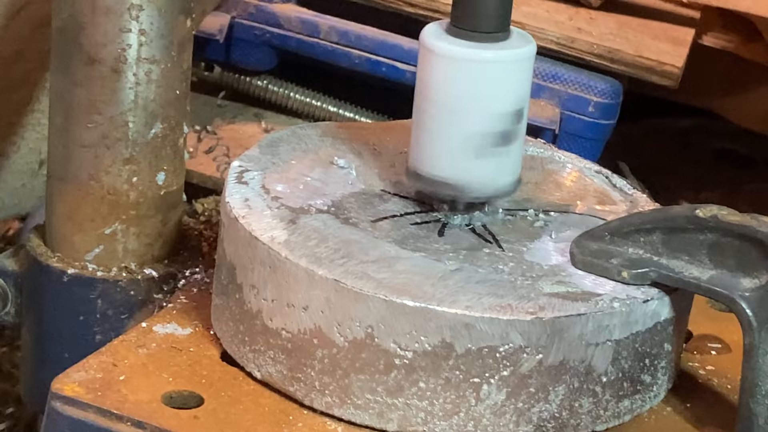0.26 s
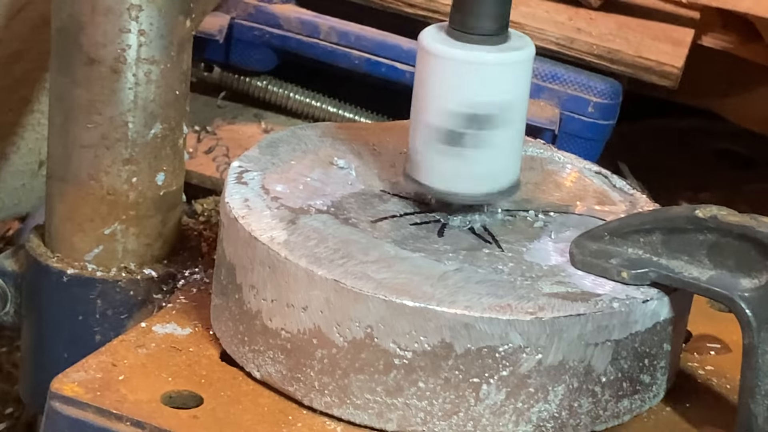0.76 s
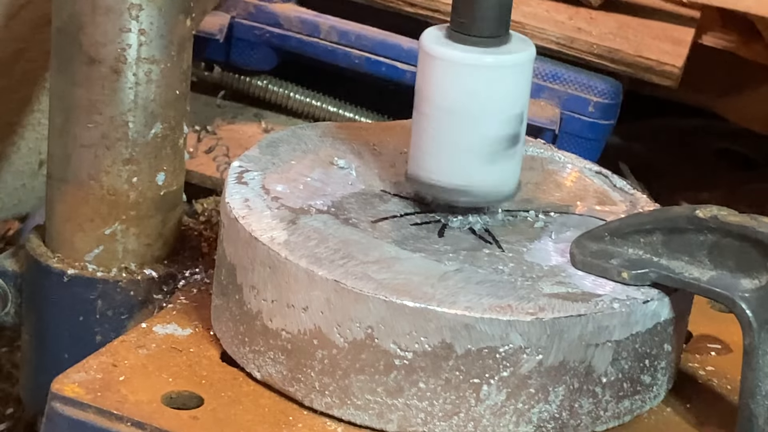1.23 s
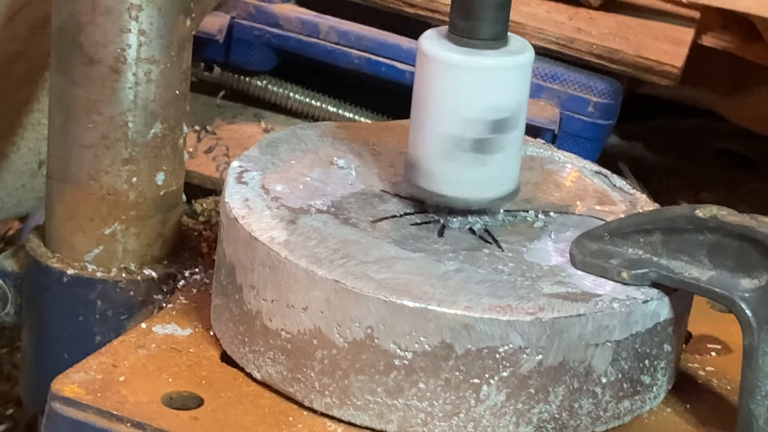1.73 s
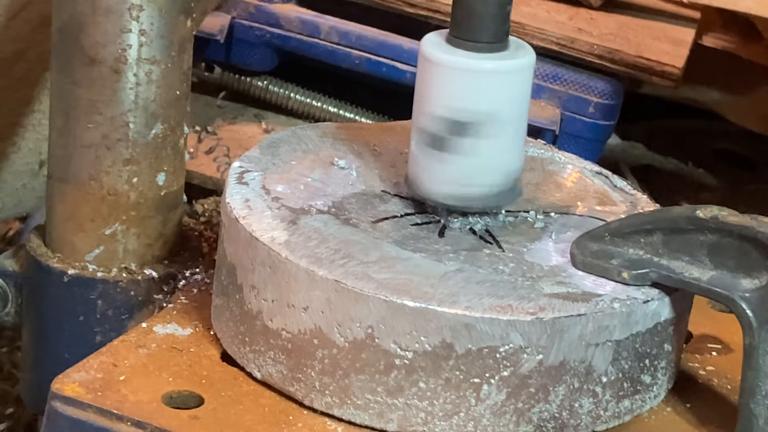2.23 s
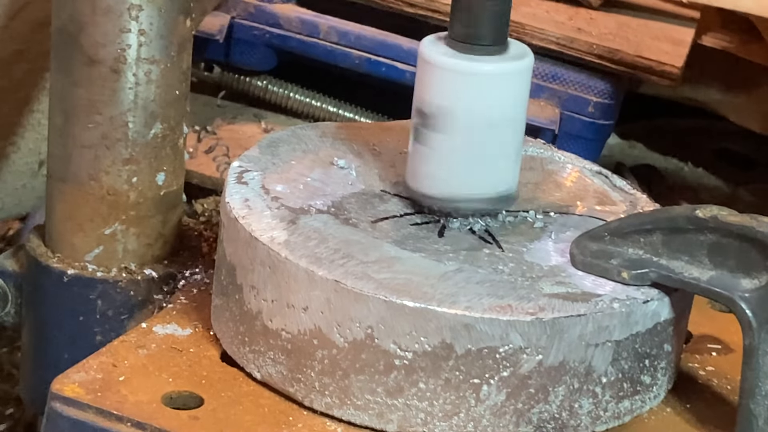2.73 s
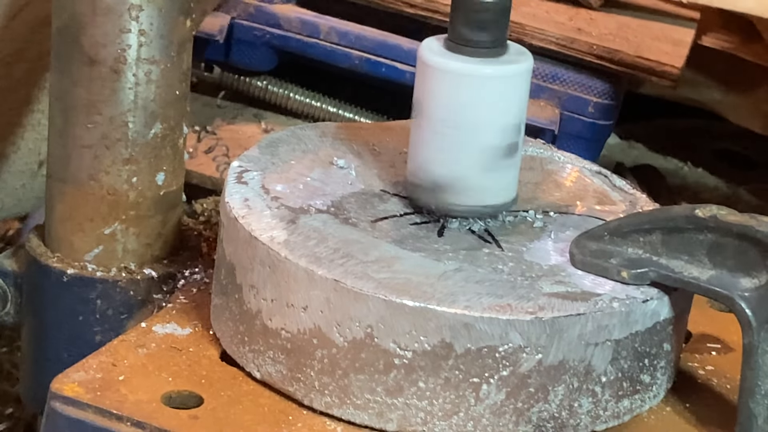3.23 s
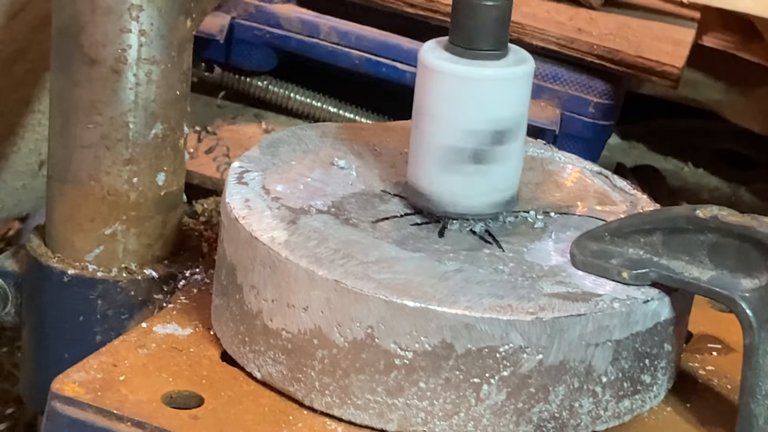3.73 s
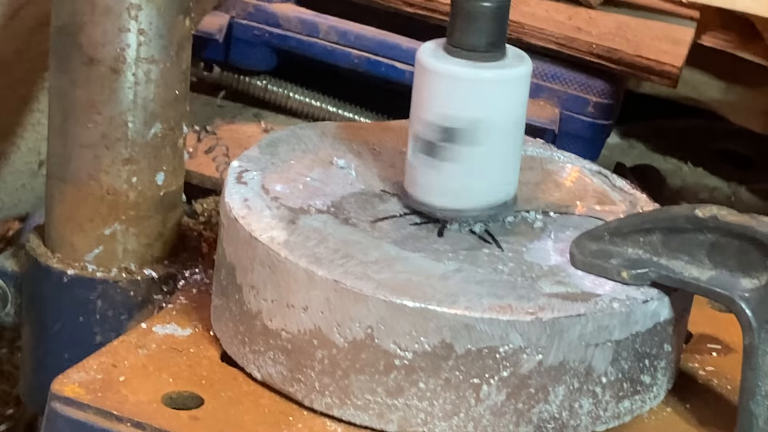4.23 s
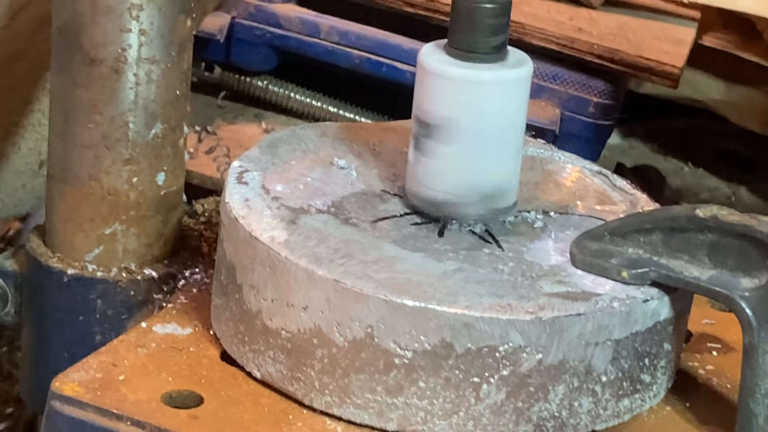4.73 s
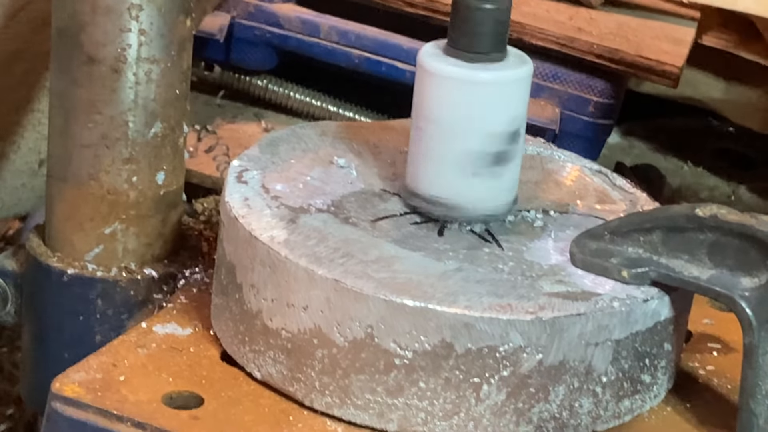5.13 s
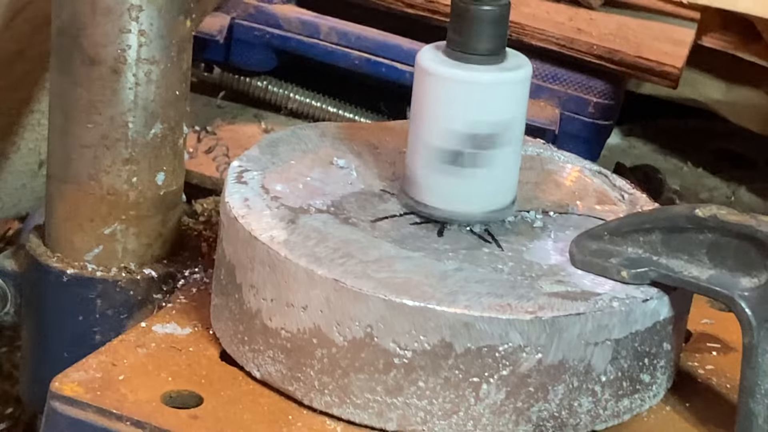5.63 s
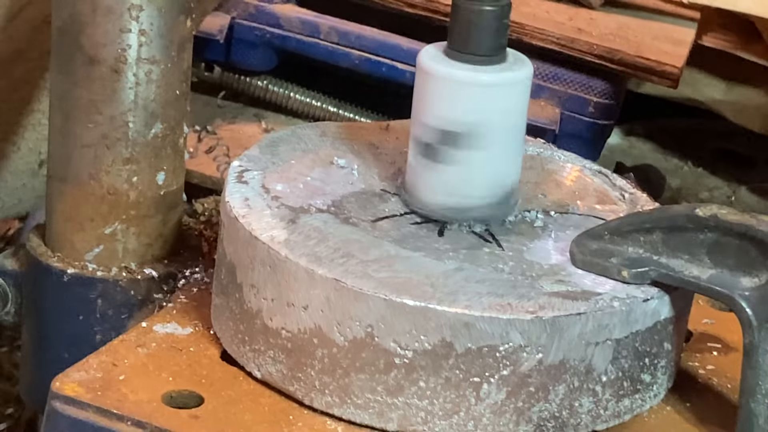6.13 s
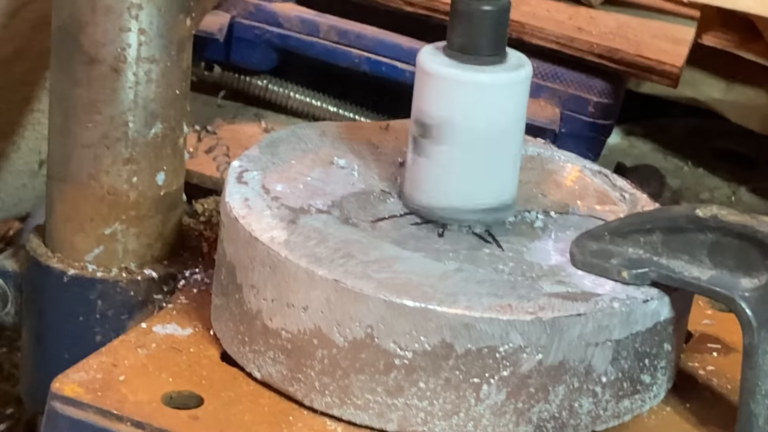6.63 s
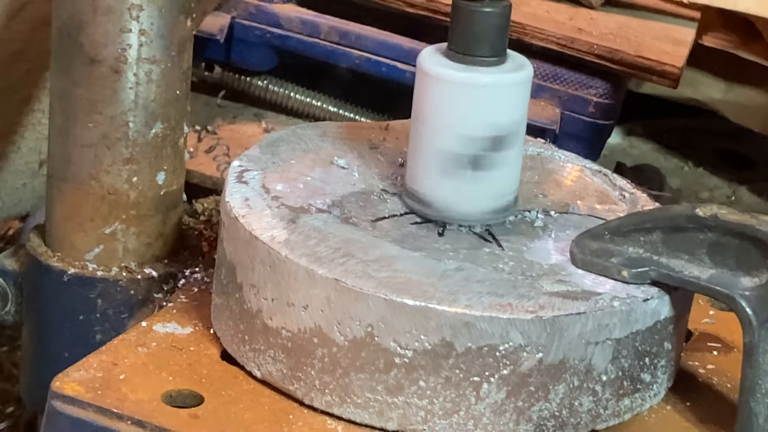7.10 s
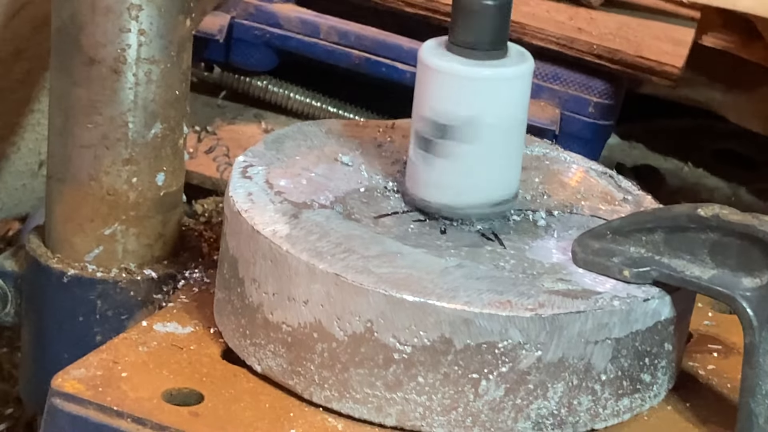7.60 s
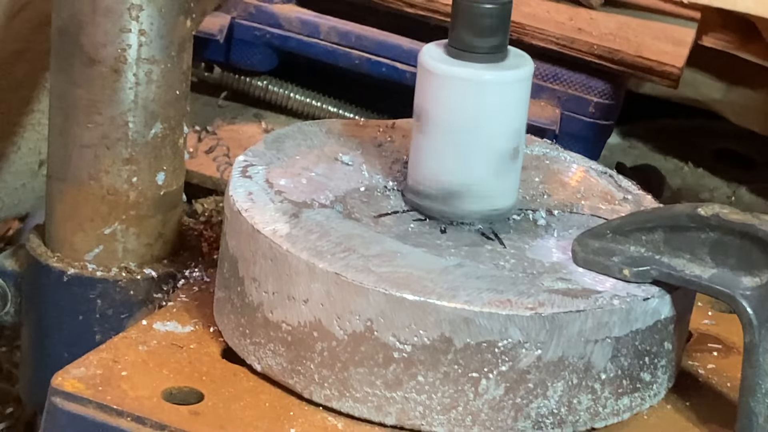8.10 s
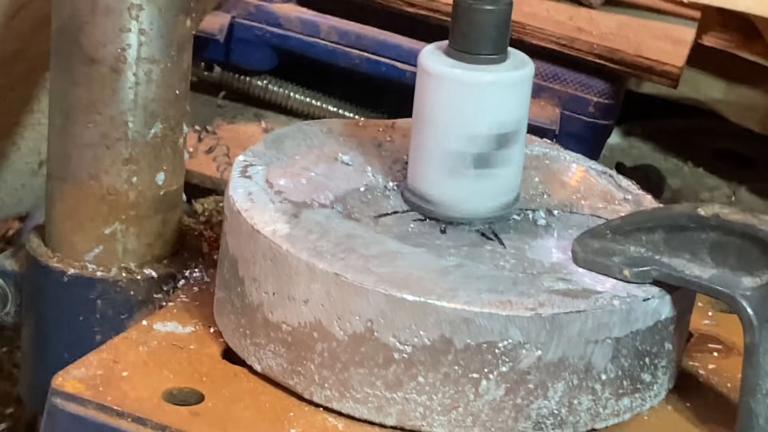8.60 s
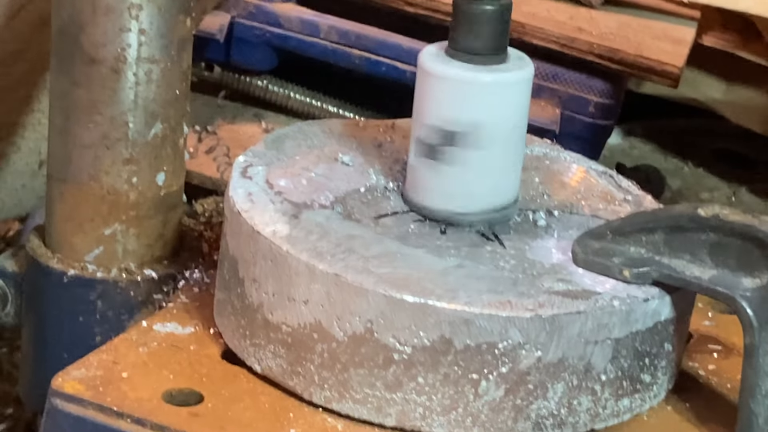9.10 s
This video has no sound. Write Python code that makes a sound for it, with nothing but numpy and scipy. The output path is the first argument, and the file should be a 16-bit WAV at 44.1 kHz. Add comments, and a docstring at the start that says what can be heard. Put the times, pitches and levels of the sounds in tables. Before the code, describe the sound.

A drill press whirrs with a thump each turn, then a hole saw grinds into thick aluminum in pulsing, rasping bites, ending in thin squeaks.

```python
"""A motor whirrs and hums with a thump every turn, while teeth hiss over metal and loose chips tick.
It is a belt-driven drill press idling in a workshop, which then feeds a hole saw into a thick aluminium disc.
The saw runs a little off true and bites hardest once a turn: noisy chip impacts ring the table and steel cup.
With the feed eased, the saw catches once a turn and its wall squeaks in the groove: gliding, stuttering tones."""
import sys
import numpy as np
from scipy import signal
from scipy.fft import rfft, irfft
from scipy.io import wavfile
from scipy.ndimage import uniform_filter1d

SR = 44100
rng = np.random.default_rng(int(sys.argv[2]) if len(sys.argv) > 2 else 0)


def int16_out(signal):
    """Quantize to a 16-bit WAV file."""
    q = np.round(np.clip(np.atleast_2d(signal).T, -1, 1) * 32767)
    wavfile.write(sys.argv[1], SR, q.astype(np.int16))


N = 412335
TIME = np.arange(N) / SR
BINS = np.fft.rfftfreq(N, 1 / SR)

# mains hum and motor whine: (pitch [Hz], level [dB])
HUM_TONES = [(120, -53), (240, -45), (360, -45.3), (739, -48.3), (1362, -64)]
# broad colours of motor, table, teeth, hiss, chips and crunch: (frequency [Hz], relative density [dB per Hz])
MOTOR_COLOUR = [(30, -28.5), (65, 1.5), (160, 6), (200, -9), (330, -1), (580, -5.5), (900, -12.5),
                (1650, -16.5), (2100, -24.5), (5500, -28.5), (11000, -24), (15500, -42)]
TABLE_COLOUR = [(20, -45), (65, -16), (220, -9.5), (330, 7.5), (490, -1.5), (680, -2), (950, -12),
                (1400, -6), (4600, -18.5), (8000, -36.5)]
TEETH_COLOUR = [(200, -39.5), (1500, -3.5), (2600, 7.5), (5000, -5), (5900, -4), (7500, 8), (8600, -4.5),
                (9700, -1), (11000, 7.5), (14200, -2)]
HISS_COLOUR = [(2000, -5), (5500, -8.5), (6500, -3), (8200, 2), (11000, -1), (15000, -4)]
CHIP_COLOUR = [(6500, -21), (11000, 4), (15000, -6.5)]
CRUNCH_COLOUR = [(200, -34), (560, 2.5), (1200, -1.5), (2100, -3.5), (4700, -4), (7000, -11.5),
                 (15000, -28)]
# resonances that stand out of those colours (the idle whirr also rings a split pair of saw-cup modes near 2.9
# kHz): (frequency [Hz], width [Hz], height [dB])
IDLE_PEAKS = [(523.8, 19, 12.5), (2842, 32, 14.5), (2920, 71, 14), (3180, 250, 4.5)]
TABLE_PEAKS = [(357.4, 6.3, 9.7), (396, 11, 6.6), (452, 14.4, 9.1), (549, 25, 5.4), (629, 28, 5.7),
               (734, 35, 11), (857, 58, 10), (966, 15.4, 12.2), (1067.5, 110, 13.6), (1261.3, 29, 10.6)]
SAW_PEAKS = [(3082, 61, 6.8), (7370, 250, 6), (4790, 270, 7), (12870, 220, 8.2)]
RATTLE_PEAKS = [(10760, 220, 9), (11670, 200, 11), (15020, 140, 16)]
# the teeth skim the disc before the cut: (time [s], hiss [dB])
SKIM_HISS = [(0, -49.5), (.7, -41.5), (1.2, -58), (1.35, -48), (1.5, -76), (1.6, -48), (2.05, -44),
             (2.2, -56), (2.35, -44), (3.4, -43), (3.6, -55)]
# loose chips tick against the saw: (time [s], level [dB])
CHIP_TICKS = [(0.056, -41), (1.283, -25.5), (1.824, -39), (1.933, -30.5), (2.148, -34), (3.673, -52),
              (3.923, -37), (5.365, -16.5)]
# the steady cut: (time [s], shaking of the table [dB], rasp of the teeth before drops [dB],
# drop of the rasp between bites [dB])
FEED_LEVELS = [(3.9, -97, -79, 15.5), (3.93, -38, -31.5, 2.5), (4.0, -31, -33, 0.5), (4.015, -21.5, -20, 4),
               (5.4, -20, -29, -1), (7.36, -17, -29.5, -2), (7.4, -33, -26, 3), (7.48, -77, -20.5, 31),
               (7.7, -31, -23, 8.5), (8.1, -28, -14.5, 13.5), (9.35, -27.5, -29, 2)]
# how strongly the cut excites five resonances as the groove deepens: (time [s], table thud [dB],
# clamp boom [dB], column groan [dB], saw ring [dB], saw whistle [dB])
CHATTER_LEVELS = [(4.1, -8.5, -10, -35, -9, -24), (4.6, -13, -16, -8.5, -12, -10),
                  (5.3, -20, -9, 2.5, -19, -13.5), (5.9, -41, -13, 4.5, -11.5, -10.5),
                  (6.6, -15, -12.5, -3.5, -14, -11), (7.35, -20, -18, -4, -21, -10.5),
                  (7.7, -27, -12.5, -4, -7.5, -27), (8.2, -24, -6, -10, -11.5, -12),
                  (9.35, -14, -7.5, -5, -13, -25)]
# how hard the high side bites, and how its place drifts round the groove:
# (time [s], level [dB], lag in the turn [s])
BITE_DRIFT = [(4.05, -21.5, -0.01), (4.75, -18.5, -0.0012), (5.33, -27, -0.018), (5.55, -33.5, -0.0077),
              (5.72, -21, -0.0073), (6.32, -18, 0.0039), (6.62, -21, 0.00073), (7.2, -20.5, 0.0086),
              (7.48, -33.5, 0.0039), (7.601, -25.5, 0.0031), (7.92, -16.5, -0.0069), (8.34, -17, -0.0088),
              (8.45, -11, -0.013), (8.56, -16, -0.0095), (9.35, -18.5, -0.014)]
# a chip jams, jolts the table and sets one mode singing:
# (time [s], level of the note [dB], pitch [Hz], length [s], jolt [dB])
CHIP_JAMS = [(3.975, -28, 2950, 0.062, -50), (4.19, -20, 2946, 0.056, -31), (6.686, -18, 646, 0.055, -15),
             (7.11, -18.5, 655, 0.061, -21.5), (7.36, -25, 661, 0.072, -21.5)]
# tight spots in the groove squeak once a turn, most at their tightest, then wear away: (tightest at [s],
# life [s], level [dB], place in the turn [s], pitch [Hz], length [s], roughness [0-1], glide [Hz])
GROOVE_SPOTS = [(7.55, 0.24, -17, 0.0015, 10600, 0.022, 0.05, 0),
                (9, 0.69, -29, 0.019, 9540, 0.032, 0.71, -2200),
                (7.55, 0.24, -23, -0.044, 9270, 0.01, 0.47, 1400)]
# the wall snags and chirps: (time [s], level [dB])
WALL_CHIRPS = [(7.416, -19), (7.473, -10), (7.5154, -14), (7.5245, -9.5), (7.578, -23), (7.629, -13.5),
               (7.735, -17), (7.846, -21), (8.146, -19), (8.359, -15.5), (8.468, -9), (8.5753, -8.5),
               (8.685, -12.5), (8.9, -18.5), (9.224, -23)]
# how far the left microphone port leads: (frequency [Hz], phase [radians])
PORT_LEAD = [(150, 0), (520, .4), (900, 1.2), (2500, .7), (3500, 2), (4570, .7), (5300, 3.1), (6050, 2.5),
             (6450, 1.1), (7000, 0), (9100, -3.1), (11450, -6.3), (13600, -9.4), (15700, -12.4)]
# how alike the two ports hear: (frequency [Hz], likeness [0-1])
PORT_LIKENESS = [(220, .975), (600, .68), (2300, .6), (4500, .75), (6500, .96)]
# left minus right: (frequency [Hz], level [dB])
PORT_BALANCE = [(450, 0), (800, 3), (5200, 0), (7100, 1.8), (8300, 0)]

# one idle turn; moments when the belt seam passes and a tooth brushes the chips [s]
TURN_S, BELT_AT_S, BRUSH_AT_S = .1075, 2.31, 1.284
RATTLES_PER_S = 55  # loose chips flung against the cup
FIRST_BITE_S, CUT_TURN_S = 4.049, .1076  # first bite, then one turn under load
TOOTH_HZ = 110  # teeth passing the thickest part of the cut
# modes of table, clamp, column and saw cup: (frequency [Hz], width [Hz])
THUD, BOOM, GROAN, RING = (103, 34), (162.4, 32.4), (295, 26.9), (2890, 103)
WHISTLE, SING = (4570, 55), (7090, 200)  # two higher cup modes
DETUNE = .009  # rms share by which the cup's modes stray as the groove grips it
CRACKS_PER_S = 1600  # thick chips breaking off during a bite
PATCHY_DB, PATCHY_FROM_HZ = 3.0, 500  # how unevenly the chips ring, above this pitch
EASED_S = 7.4  # squeaks start once the feed is eased
# the wall screeches just ahead of every bite, slowly growing louder
SCREECH_DB, SCREECH_GROWTH_DB_PER_S = -20, 1.1
SCREECH_HZ, SCREECH_S, SCREECH_LEAD_S = 12270, 0.043, 0.0021
WEAR_DB = 11  # a spot is this much quieter one life before or after its tightest moment
CHIRP_HZ = 11550


def amp(db):
    """Decibels to gain."""
    return 10 ** (np.asarray(db) / 20)


def unit(x):
    """Scales to rms 1."""
    return x / np.sqrt(np.mean(x ** 2) + 1e-20)


def curves(rows):
    """The columns of a table, joined by straight lines in time."""
    s, *columns = np.transpose(rows)
    return [np.interp(TIME, s, c) for c in columns]


def read(points, hz):
    """A table's value on a log-frequency axis."""
    f, value = np.transpose(points)
    return np.interp(np.log(hz + 1), np.log(f), value)


def add(mix, s, sound):
    """Mixes a sound in at time s."""
    part = mix[round(s * SR):][:len(sound)]
    part += sound[:len(part)]


def wander(rate_hz):
    """Random drift of rms 1: straight lines between two chance points per cycle of the rate."""
    return unit(np.interp(2 * rate_hz * TIME, np.arange(SR), rng.standard_normal(SR)))


def tone(hz):
    """A sine of rms 1 that follows a pitch curve."""
    return np.sqrt(2) * np.sin(2 * np.pi * (np.cumsum(hz) / SR + rng.random()))


def swell(s, length):
    """The samples that a short sound covers, and its smooth rise and fall."""
    near = slice(*np.searchsorted(TIME, [s - length / 2, s + length / 2]))
    return near, np.cos(np.pi * (TIME[near] - s) / length) ** 2


def body(x, colour, modes=(), size=16384):
    """Plays x through a causal filter made of a broad colour and its resonances."""
    hz = np.fft.rfftfreq(size, 1 / SR)
    db = read(colour, hz)
    for f, width, height in modes:
        db = db + height / (1 + (2 * (hz - f) / width) ** 2)
    # minimum phase: the response starts at once
    log_gain = np.log(amp(np.r_[db, db[-2:0:-1]]))
    response = np.fft.ifft(np.exp(signal.hilbert(log_gain).conj())).real[:len(hz)]
    return signal.oaconvolve(x, response / np.linalg.norm(response))[:N]


def resonate(x, hz, width):
    """One mode with steep skirts; white noise keeps its level."""
    t = TIME[:SR // 10]
    ring = t * np.exp(-np.pi * width * t) * np.sin(2 * np.pi * hz * t)
    return signal.oaconvolve(x, ring / np.linalg.norm(ring))[:N]


def chips(per_s, spread_db=3.0):
    """A stream of tiny impacts, most small and a few large."""
    size = amp(spread_db * np.minimum(rng.exponential(1, N), 4))
    struck = rng.choice([-1, 1], N) * (rng.random(N) < per_s / SR)
    return unit(size * struck)


def once_a_turn(at, width):
    """A soft pulse that comes round with the idle spindle."""
    since = (((TIME - at) / TURN_S + .5) % 1 - .5) * TURN_S
    return np.exp(-(since / width) ** 2)


def motor(whirr_db=-35.5, seam_db=-30, waver=0.0013, repeat=0.74):
    """Fan and bearings whirr, partly alike in every turn; windings hum, and the belt seam thumps once a turn."""
    bearings = np.resize(rng.standard_normal(round(TURN_S * SR)), N)
    rumble = unit(chips(12000) + repeat * bearings)
    whirr = amp(whirr_db + wander(18)) * body(rumble, MOTOR_COLOUR, IDLE_PEAKS)
    hum = np.zeros(N)
    for hz, db in HUM_TONES:
        hum += amp(db + wander(8.6) / 2) * tone(hz * (1 + waver * wander(10)))
    thump = rng.standard_normal(N) * once_a_turn(BELT_AT_S, width=0.003)
    seam = body(thump, [(30, -46), (65, 8.0), (160, 6.5), (230, -16.0), (4000, -83)])
    return whirr + hum + amp(seam_db) * seam


def skim(brush_db=-47, rattle_db=-49, tick_s=0.012):
    """The teeth barely brush the metal, and loose chips rattle and tick against the cup."""
    hiss = amp(curves(SKIM_HISS)[0]) * body(chips(9000), HISS_COLOUR)
    brush = amp(brush_db) * chips(4700) * once_a_turn(BRUSH_AT_S, width=0.0028)
    rattle = brush + amp(rattle_db) * chips(RATTLES_PER_S)
    ticks, t = np.zeros(N), TIME[:SR // 20]
    for s, db in CHIP_TICKS:
        add(ticks, s, amp(db) * np.exp(-t / tick_s) * rng.standard_normal(len(t)))
    return hiss + body(ticks + rattle, CHIP_COLOUR, RATTLE_PEAKS)


def turns():
    """The moments when the high side of the saw comes round."""
    return np.arange(FIRST_BITE_S, N / SR, CUT_TURN_S)


def bites():
    """One bite a turn: (time [s], level [dB])."""
    s, db, lag = np.transpose(BITE_DRIFT)
    return [(at + np.interp(at, s, lag), np.interp(at, s, db)) for at in turns()]


def cup_mode(x, hz, width):
    """One mode of the saw cup, its pitch straying in the groove; white noise keeps its level."""
    # shift the mode down to zero pitch, smooth it there, then shift it back
    turn = np.exp(2j * np.pi * np.cumsum(hz * (1 + DETUNE * wander(30))) / SR)
    t = TIME[:SR // 20]
    ring = t * np.exp(-np.pi * width * t)
    smoothed = signal.oaconvolve(x / turn, ring / np.linalg.norm(ring))[:N]
    return np.sqrt(2) * (turn * smoothed).real


def cut(rise_s=0.023, fall_s=0.021, tooth_db=-0.5, grit_db=1.5, table_db=-4.0, rub=0.88, sharpness=0.5,
        sing_db=-9, wall_lead_s=0.021, flare_db=-13, ping_db=-4, grip_hz=90):
    """Chips break off under the teeth, hardest at each bite; they shake the table and ring the saw."""
    shake, rasp, drop = curves(FEED_LEVELS)
    thud, boom, groan, ring, whistle_db = curves(CHATTER_LEVELS)
    pulse, bite = np.zeros(N), np.zeros(N)
    t = np.arange(-SR // 10, SR // 10) / SR
    hump = np.exp(-(t / np.where(t < 0, rise_s, fall_s)) ** 2)
    for s, db in bites():
        add(pulse, s + t[0], hump ** sharpness)
        add(bite, s + t[0], amp(db) * hump)
    for s, *_, jolt_db in CHIP_JAMS:
        add(bite, s + t[0], amp(jolt_db) * hump)
    # the teeth pass one by one, and each takes an uneven chip
    teeth = amp(tooth_db * np.cos(2 * np.pi * TOOTH_HZ * TIME) + grit_db * wander(160))
    fractures = unit(teeth * chips(6000))
    force = np.hypot(amp(shake), bite) * fractures
    table = amp(table_db) * body(force, TABLE_COLOUR, TABLE_PEAKS) + amp(thud) * resonate(force, *THUD)
    clamp = amp(boom) * resonate(force, *BOOM)
    # each bite sets the column chattering, a nearly pure note that lags the force
    swing = np.interp(TIME - .007, TIME, bite) + 0.089 * amp(shake)
    column = amp(groan + 1.4 * wander(50)) * swing * tone(GROAN[0] + GROAN[1] / 2 * wander(40))
    # the rasp loses two drops at a bite and three between bites
    scrape = amp(rasp - drop * (3.0 - pulse)) * unit(fractures + rub * teeth * rng.standard_normal(N))
    cup = body(scrape, TEETH_COLOUR, SAW_PEAKS)
    flare = amp(flare_db) * bite * fractures
    whistle = amp(whistle_db + 2 * wander(30)) * cup_mode(scrape / 2 + flare, *WHISTLE)
    # the wall rubs before the teeth bite and sets the cup singing, higher as the groove grips it
    wall = np.maximum(pulse, np.interp(TIME + wall_lead_s, TIME, pulse))
    rubbing = amp(rasp - drop * (1.5 - wall)) * fractures
    sing = amp(ring + 2 * wander(25)) * cup_mode(rubbing, RING[0] + grip_hz * wall, RING[1])
    sing += amp(sing_db + 2 * wander(40)) * cup_mode(rubbing, *SING)
    ping = amp(ring + ping_db + 3.3 * wander(60)) * body(rubbing, HISS_COLOUR, RATTLE_PEAKS)
    return table + clamp + column + cup + whistle + sing + ping


def jams(waver=0.02):
    """Jammed chips set off brief wavering notes of the table and the cup."""
    out, drift = np.zeros(N), wander(97)
    for s, db, hz, length, _ in CHIP_JAMS:
        near, shape = swell(s, length)
        out[near] += amp(db) * shape * tone(hz * (1 + waver * drift[near]))
    return out


def crunch(level_db=-9.5, lead_s=0.015, rise_s=0.011, fall_s=0.024, clump_db=3):
    """Each bite opens with thick chips cracking off in uneven clumps."""
    force, t = np.zeros(N), np.arange(-SR // 10, SR // 10) / SR
    hump = np.exp(-(t / np.where(t < 0, rise_s, fall_s)) ** 2)
    for s, db in bites():
        add(force, s - lead_s + t[0], amp(db + level_db) * hump)
    cracks = unit(amp(clump_db * wander(220)) * chips(CRACKS_PER_S))
    return body(force * cracks, CRUNCH_COLOUR, TABLE_PEAKS)


def patchy(x, size=256):
    """Each clump of chips breaks at another spot, so the ringing shifts from pitch to pitch."""
    hz, _, z = signal.stft(x, SR, nperseg=size)
    across_pitch = uniform_filter1d(rng.standard_normal(z.shape), size=2, axis=0)
    patches = unit(uniform_filter1d(across_pitch, size=4, axis=1))
    depth_db = PATCHY_DB * np.clip(hz / PATCHY_FROM_HZ - 1, 0, 1)[:, None]
    gain = amp(depth_db * patches)
    gain = gain / np.sqrt(np.mean(gain ** 2, axis=1, keepdims=True))
    return signal.istft(z * gain, SR, nperseg=size)[1][:N]


def machine():
    """Motor, cut, crunch and jams together, with a short level dip near 7.4 s and 3 dB less afterwards;
    the skimming is added unchanged."""
    level_db = np.interp(TIME, [7.375, 7.403, 7.425], [0, -18, -3])
    return amp(level_db) * (motor() + patchy(cut() + crunch()) + jams()) + skim()


def slips():
    """Screeches and tight spots: (time [s], level [dB], pitch [Hz], length [s], roughness [0-1], glide [Hz])."""
    rows = []
    for s, _ in bites():
        screech_db = SCREECH_DB + SCREECH_GROWTH_DB_PER_S * (s - EASED_S)
        rows.append((s - SCREECH_LEAD_S, screech_db, SCREECH_HZ, SCREECH_S, 1, 0))
    for tightest, life, db, place, *voice in GROOVE_SPOTS:
        rows += [(s + place, db - WEAR_DB * ((s - tightest) / life) ** 2, *voice) for s in turns()]
    return [row for row in rows if row[0] > EASED_S]


def squeaks(skew=0.79, scatter_hz=430, arch_hz=550, stutter_db=6, slips_per_s=380, crackle_db=-13, count=2):
    """Stick-slip tones at two points of the wall beat together; rough ones arch, jump, stutter and crackle."""
    out, tearing = np.zeros(N), np.zeros(N)
    for _ in range(count):
        jumps, stutter = wander(slips_per_s), np.tanh(wander(slips_per_s))
        for s, db, hz, length, rough, glide in slips():
            near, arch = swell(s, length)
            rise_and_fall = np.sin(np.pi * np.linspace(0, 1, len(arch)) ** skew) ** 2
            shape = amp(db) / np.sqrt(count) * rise_and_fall
            bend = rough * (scatter_hz * jumps[near] - arch_hz * (1 - arch))
            note = tone(hz + glide * (TIME[near] - s) / length + bend)
            out[near] += shape * unit(amp(rough * stutter_db * stutter[near]) * note)
            tearing[near] += amp(crackle_db) * rough * shape
    return out + body(tearing * chips(2000), HISS_COLOUR)


def chirps(rise_s=.0028, ring_s=0.0039, waver_hz=90):
    """The wall catches and lets go: one high mode of the cup builds up quickly and rings out."""
    out, t = np.zeros(N), np.arange(-SR // 50, SR // 50) / SR
    shape = np.exp(np.where(t < 0, -(t / rise_s) ** 2, -t / ring_s))
    grip = wander(400)
    for s, db in WALL_CHIRPS:
        unsteady = grip[round(s * SR):][:len(t)]
        add(out, s + t[0], amp(db) * shape * tone(CHIRP_HZ + waver_hz * unsteady))
    return out


def ports(direct, diffuse):
    """Direct sound reaches two microphone ports at different moments; diffuse workshop sound differs in them."""
    side = np.array([[.5], [-.5]])
    same = np.clip(read(PORT_LIKENESS, BINS), 0, 1)
    shared = np.sqrt((1 + same) / 2) * rfft(direct)
    opposed = 2 * side * np.sqrt((1 - same) / 2) * rfft(diffuse)
    lead = np.exp(1j * side * read(PORT_LEAD, BINS))
    return irfft((shared + opposed) * lead * amp(side * read(PORT_BALANCE, BINS)), N)


def scene(scatter_db=-5):
    """The machine and its squeaks, near and scattered about the workshop."""
    near = machine() + squeaks() + chirps()
    scattered = machine() + amp(scatter_db) * squeaks()
    return ports(near, scattered)


def record(dry):
    """A steep low-pass closes off the very top of the treble."""
    low_pass = signal.firwin(511, 15850, window=("kaiser", 9), fs=SR)  # edge in Hz
    return signal.oaconvolve(dry, low_pass[None], "same")


dry = scene()
out = record(dry)
int16_out(out)
```